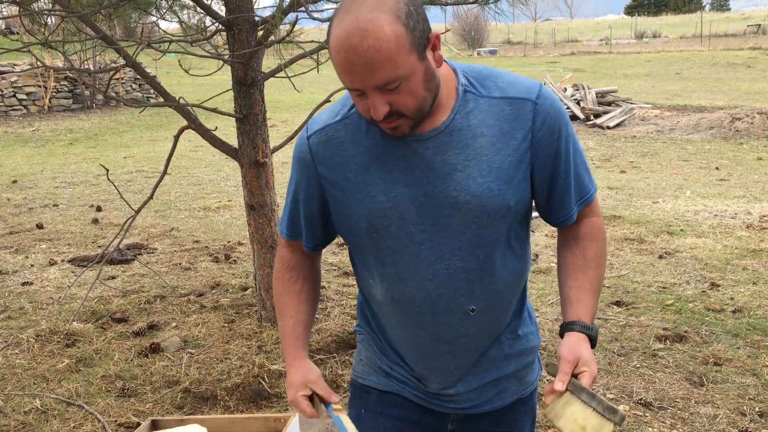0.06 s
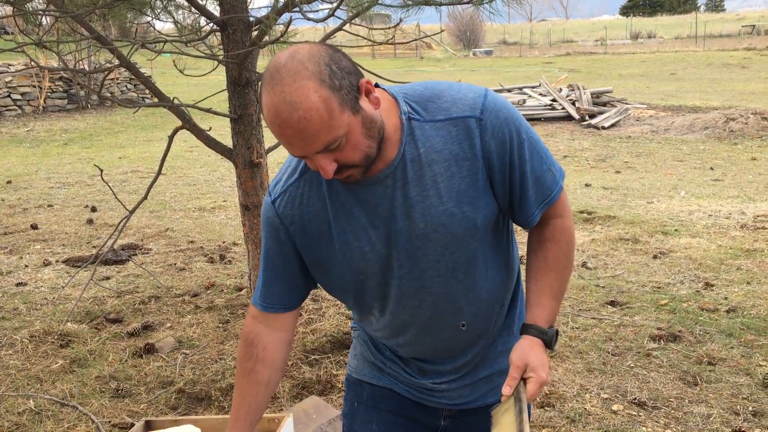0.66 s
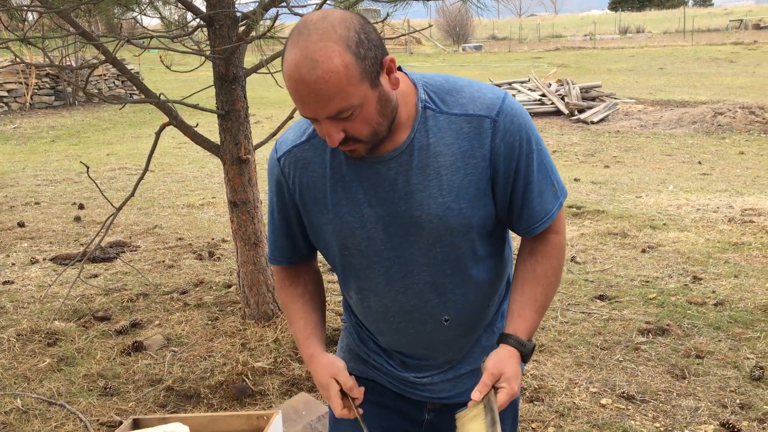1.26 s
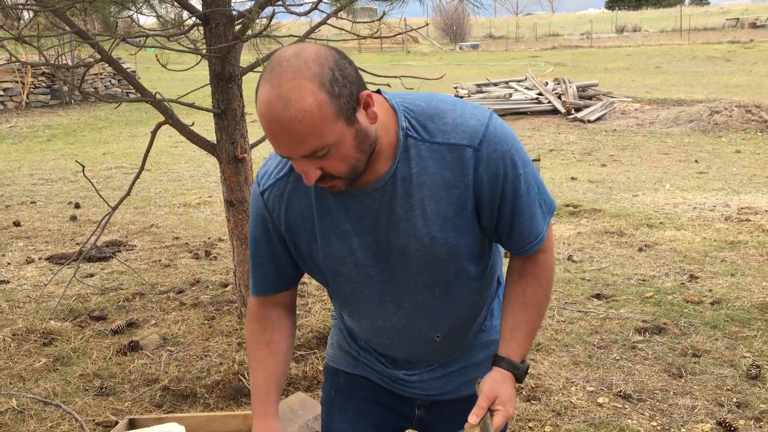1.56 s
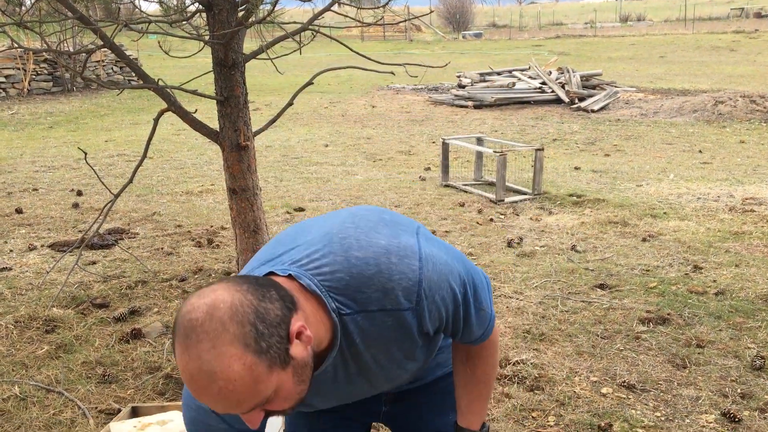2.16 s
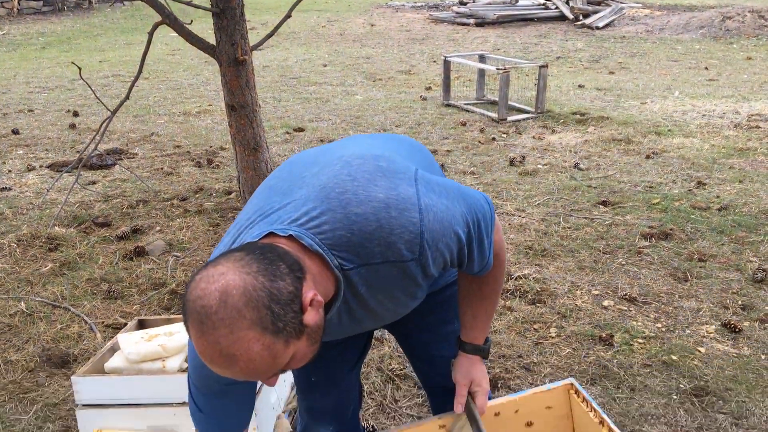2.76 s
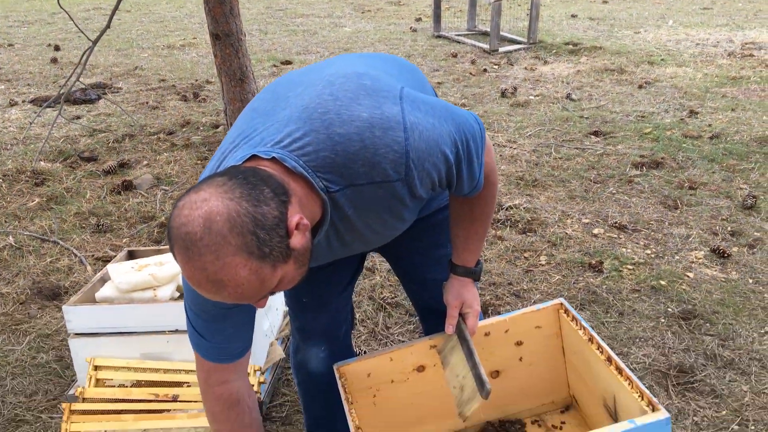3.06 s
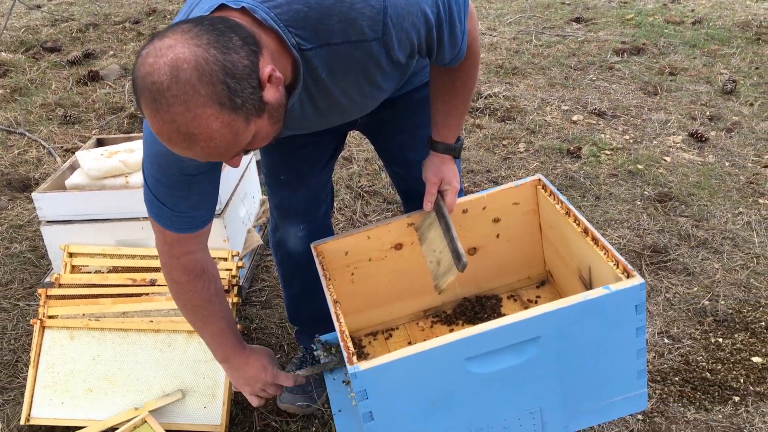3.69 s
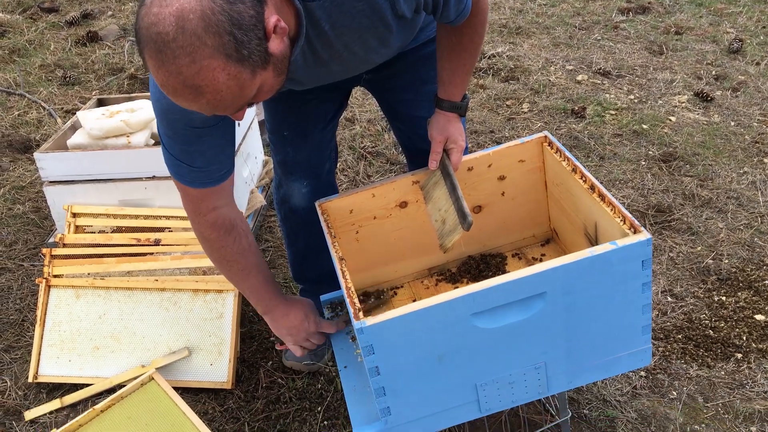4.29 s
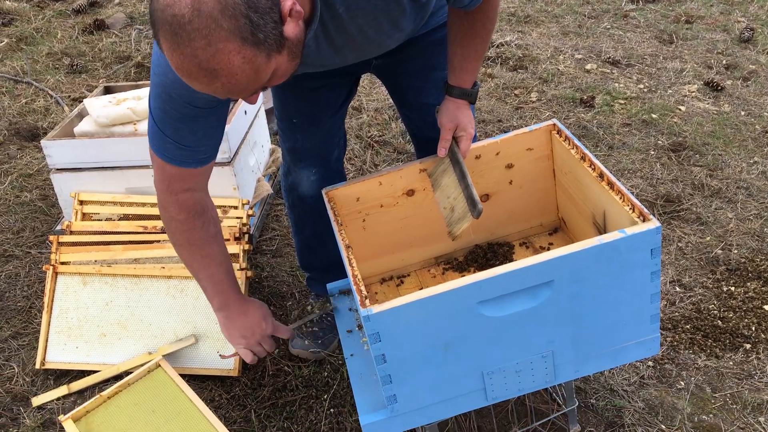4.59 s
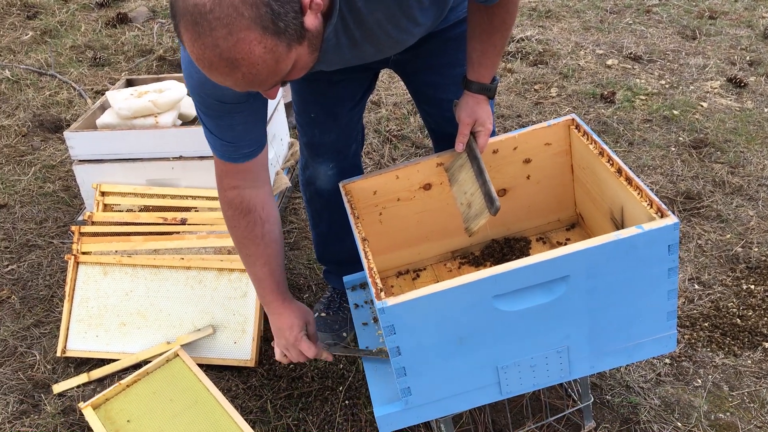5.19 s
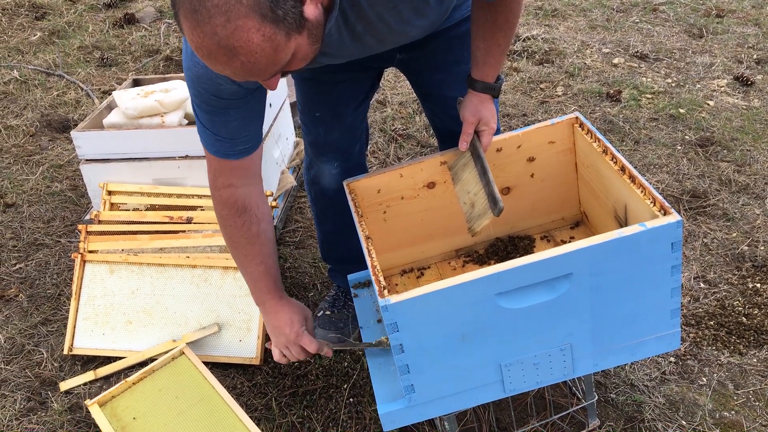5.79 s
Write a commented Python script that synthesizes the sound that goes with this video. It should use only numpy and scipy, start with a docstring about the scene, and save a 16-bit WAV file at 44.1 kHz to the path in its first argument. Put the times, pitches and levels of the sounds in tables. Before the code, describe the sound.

Short, gritty scrapes and knocks of a metal blade on a hollow wooden hive, outdoors over gusty low wind rumble.

```python
"""A steel hive tool scrapes wax and debris off a beehive in short strokes, after clacking on loose wood.
Each stroke is a run of tiny slips that rings the boards, the hollow box and the blade over a gritty hiss
of crumbs; now and then the edge catches, squawks or squeaks, and the open box echoes briefly.
Outdoors, wind buffets the microphone in gusts, a far bird chirps, and a limiter holds down the peaks."""
import sys
import numpy as np
from scipy import signal
from scipy.fft import rfft, irfft, next_fast_len
from scipy.io import wavfile
from scipy.ndimage import uniform_filter1d, minimum_filter1d, map_coordinates

SR = 44100
rng = np.random.default_rng(int(sys.argv[2]) if len(sys.argv) > 2 else 0)


def dump(signal):
    """Clip the signal to [-1, 1] and save it as 16-bit WAV at the path in sys.argv[1]."""
    limited = np.clip(np.atleast_2d(signal).T, -1, 1)
    pcm = np.round(limited * 32767).astype(np.int16)
    wavfile.write(sys.argv[1], SR, pcm)


N = 266364

# resonances of the hive's boards: f/Hz, width/Hz, level/dB
BOARD_MODES = [(640, 70, -14), (941, 22, -0.5), (1010, 40, -1), (1165, 34, 6.5), (1255, 45, -3),
               (1382, 38, 2.5), (1540, 110, -4), (1685, 45, -4), (2035, 90, -4), (2240, 55, -5),
               (2449, 60, -7), (2774, 60, -9), (3435, 200, -13), (3900, 260, -16)]
# low resonances of the hollow box: f/Hz, width/Hz, level/dB
HOLLOW_MODES = [(216.6, 24.4, -4), (246.5, 15.3, 2.5), (314.7, 26.4, 0.5), (418, 16, -12), (530, 45, -13)]
# broad rasp of the wood: f/Hz, relative level/dB
RASP_SPECTRUM = [(200, 6), (780, 9.5), (1150, 21.5), (2200, -34), (3600, -66), (5000, -20), (9000, -21)]


def amp(db):
    """Decibels to gain."""
    return 10 ** (np.asarray(db) / 20)


def unit(x):
    """x at rms 1."""
    return x / np.sqrt(np.mean(x ** 2) + 1e-20)


def unit_attack(x):
    """x with its first 8 ms at rms 1."""
    return x / np.sqrt(np.mean(x[:350] ** 2) + 1e-20)


def wobble(rate):
    """A smooth random curve, rate knots a second."""
    knots = rng.standard_normal(int(N * rate / SR) + 4)
    return map_coordinates(knots, [np.arange(N) * rate / SR])


def filtered(x, response):
    """x through a complex frequency response."""
    size = next_fast_len(len(x) + SR // 4)
    return irfft(rfft(x, size) * response(np.fft.rfftfreq(size, 1 / SR)), size)[:len(x)]


def coloured(x, spectrum):
    """x through an EQ curve with rows f/Hz, level/dB."""
    f, db = np.transpose(spectrum)
    return filtered(x, lambda hz: amp(np.interp(np.log(hz + 1), np.log(f), db)))


def resonate(x, modes):
    """x through resonances of alternating polarity, with rows f/Hz, width/Hz, level/dB."""
    return filtered(x, lambda f: sum(
        (-1) ** k * amp(db) * 1j * f * width / (hz * hz - f * f + 1j * f * width)
        for k, (hz, width, db) in enumerate(modes)))


def add(track, s, sound):
    """Mix a sound into the track at time s."""
    rest = track[round(s * SR):]
    rest[:len(sound)] += sound[:len(rest)]


def burst(t60):
    """A flurry of tiny impacts: noise that falls 60 dB in t60 seconds."""
    t = np.arange(SR // 5) / SR
    return rng.standard_normal(len(t)) * amp(-60 * t / t60)


def field():
    """A faint outdoor hiss that dips as the recorder turns down during strong gusts."""
    # the recorder's gain dips, drawn as a set curve on the hiss: t/s, level/dB
    ride = [(0, -39.5), (.7, -44), (1.2, -48.5), (1.8, -48), (2.6, -42.5), (4.6, -42), (4.9, -49),
            (5.3, -43.5), (6.04, -41.5)]
    # colour of the open air: f/Hz, relative level/dB
    air = [(500, 2), (1400, 0.5), (2100, -3.5), (3300, -9), (5000, -16.5), (9000, -18.5), (13000, -23.5),
           (15800, -25)]
    level_db = np.interp(np.arange(N) / SR, *np.transpose(ride))
    return amp(level_db) * unit(coloured(rng.standard_normal(N), air))


def bird():
    """A far bird: short, wavering whistles that fall slightly."""
    # chirps: t/s, length/s, f/Hz
    chirps = [(1.905, 0.076, 3780), (1.972, 0.05, 3500), (2.084, 0.064, 3850), (2.379, 0.058, 3950)]
    out = np.zeros(N)
    for s, length, hz in chirps:
        progress = np.linspace(0, 1, int(length * SR))
        pitch = hz * (1 - 0.056 * (progress - .5) + 0.042 * wobble(600)[:len(progress)])
        whistle = np.sin(2 * np.pi * np.cumsum(pitch) / SR)
        add(out, s, amp(-47.5) * np.sin(np.pi * progress) * whistle)
    return out


def wind_strength(breeze_db=-25.5, rise_s=0.038, fall_s=0.079):
    """Wind level in dB: each gust swells 10 dB per rise_s, holds, and sinks back into the breeze."""
    # gusts: start/s, end/s, level/dB
    gusts = [(0.0, 0.132, -15.5), (0.334, 0.53, -14), (0.565, 0.884, -18.5), (1.063, 1.33, -14),
             (1.354, 1.939, -13), (1.993, 2.132, -15), (2.23, 2.516, -17.5), (2.653, 2.834, -16.5),
             (3.147, 3.773, -15), (3.824, 4.386, -16), (4.375, 4.682, -12.5), (4.808, 5.051, -12),
             (5.262, 5.418, -13), (5.607, 6.04, -15)]
    t = np.arange(N) / SR
    level_db = np.full(N, breeze_db)
    for start, end, db in gusts:
        away = np.maximum((start - t) / rise_s, (t - end) / fall_s)
        level_db = np.maximum(level_db, db - 10 * np.maximum(0, away))
    return level_db


def rumble(lumps_db=4.0):
    """Pressure of big eddies: even in the long run, lumpy from moment to moment."""
    # colour of the rumble: f/Hz, relative level/dB
    spectrum = [(18, -46), (30, -23), (46, -6), (68, 0.5), (105, -2.5), (165, -6.5), (260, -15), (400, -28),
                (650, -64), (1200, -73.5)]
    pressure = unit(coloured(rng.standard_normal(N), spectrum)) * amp(lumps_db * wobble(55))
    return pressure / np.sqrt(np.abs(uniform_filter1d(pressure ** 2, 3000)) + 1e-6)


def eddies(rows):
    """Each eddy pushes and pulls once on the microphone; smaller ones pass faster and sound higher."""
    out = np.zeros(N)
    for s, db, hz in rows:
        phase = np.arange(-5, 5, 2 * np.pi * hz / SR)
        pulse = -phase * np.exp((1 - phase ** 2) / 2)
        add(out, max(0, s - len(pulse) / SR / 2), amp(db) * pulse)
    return out


def flutter(hz=175, pitch_spread=0.28, spread_db=2.5, count=700):
    """A ragged train of small eddies, at rms 1."""
    late, strength, pitch = np.clip(rng.standard_normal((count, 3)), -2, 2).T
    times = (np.arange(count) + 0.392 * late) * N / SR / count
    return unit(eddies(zip(times, spread_db * strength, hz * np.exp(pitch_spread * pitch))))


def wind():
    """Big eddies rumble on the microphone; small ones flutter above, growing faster than the wind."""
    # single hard buffets: t/s, peak level/dB, centre f/Hz
    buffets = [(1.232, -3, 190), (1.365, -7.5, 295), (1.546, -7.5, 343), (1.934, -6.5, 255),
               (2.753, -3, 164), (3.539, -7.5, 207), (4.484, 0, 185), (4.536, -4, 214), (4.971, -8, 300),
               (5.047, -9.5, 282), (5.817, -0.5, 147)]
    strength_db = wind_strength()
    flutter_db = -19 + 4.17 * (strength_db + 13)
    return amp(strength_db) * rumble() + amp(flutter_db) * flutter() + eddies(buffets)


def cavity(x, wet_db=-8.5):
    """The brief echo of sound bouncing between the walls of the open box."""
    tail = coloured(burst(t60=0.079), [(200, -8.5), (1500, -0.5), (9000, -12.5)])
    return amp(wet_db) * np.std(x) * unit(signal.fftconvolve(x, tail)[:N])


def clacks():
    """Steel strikes loose wood and bounces: a crack, a hollow knock and a short ring at every contact."""
    # contacts: t/s, relative level of crack and ring/dB, knock level/dB, part struck
    contacts = [(.8988, -3, -39, "frame"), (0.9062, -7, -19, "frame"), (.9126, -12.5, -18, "frame"),
                (.9305, -17.5, -18.5, "frame"), (.9975, -27, -25, "board"), (1.0012, -17.5, -24, "board"),
                (1.0268, -15.5, -32, "board"), (1.0308, -10.5, -8.5, "board"), (1.039, -11, -14, "board"),
                (1.056, -18.5, -24, "board"), (1.0625, -21.5, -24, "board")]
    # modes of each loose part, the hollow knock first: f/Hz, level/dB, t60/s
    parts = {"frame": [(620, -2, .14), (1230, 0, .045), (1750, 6, .025), (2190, 3, .09), (2510, -3, .05),
             (3450, 9, .022)], "board": [(678, -2, .05), (1060, -1, .035), (1440, 2, .03), (2110, 0, .03),
             (3710, -1, .012)]}
    # colour of steel cracking on wood: f/Hz, relative level/dB
    crack_spectrum = [(300, 2), (620, -2.5), (900, 0.5), (1800, -2), (2900, -5.5), (3600, -7.5),
                      (4800, -19), (15800, -30.5)]
    out, t = np.zeros(N), np.arange(SR // 5) / SR
    knock_envelope = (1 - np.exp(-t / 0.00067)) * amp(-60 * t / 0.036)
    for s, db, knock_db, part in contacts:
        ring = np.zeros(len(t))
        for hz, mode_db, t60 in parts[part]:
            decay = amp(mode_db + 2 * rng.standard_normal() - 60 * t / t60)
            ring += decay * np.sin(2 * np.pi * (hz * t + rng.random()))
        crack = coloured(burst(t60=0.05), crack_spectrum)
        clack = amp(-13) * unit_attack(ring) + amp(-9) * unit_attack(crack)
        knock_hz = parts[part][0][0]
        knock = unit_attack(knock_envelope * np.sin(2 * np.pi * knock_hz * t))
        add(out, s, amp(db) * clack + amp(knock_db) * knock)
    return out


def squeaks(hz=12200, width_hz=900, half_length_s=0.048):
    """Bare steel gliding on wood sings in one narrow, high band."""
    # glides of the bare edge: peak t/s, level/dB
    glides = [(5.39, -52), (6.02, -43)]
    t = np.arange(N) / SR
    swell = sum(amp(db - 10 * ((t - s) / half_length_s) ** 2) for s, db in glides)
    flicker = amp(3.4 * wobble(100))
    band = [(hz, width_hz, 0)]
    return swell * flicker * unit(resonate(resonate(rng.standard_normal(N), band), band))


def grabs(sag_per_s=1.67, pitch_jitter=.04, rough_db=2):
    """Stick and slip lock into a short rough squawk that sinks as the blade slows."""
    # squawks: peak t/s, half length/s, f/Hz, level/dB
    squawks = [(2.624, .01, 1206, -13), (2.646, 0.018, 938, -22.5), (2.677, .016, 1139, -10.5)]
    # harmonics of the judder: multiple of the pitch, level/dB
    harmonics = [(1, 0), (3, -11)]
    out, t = np.zeros(N), np.arange(N) / SR
    for s, half, hz, db in squawks:
        from_peak = t[np.abs(t - s) < 2 * half] - s
        timing = wobble(hz)[:len(from_peak)]
        strength = wobble(hz / 2)[:len(from_peak)]
        pitch = hz * (1 - sag_per_s * from_peak + pitch_jitter * timing)
        phase = 2 * np.pi * np.cumsum(pitch) / SR
        tone = sum(amp(level) * np.sin(k * phase) for k, level in harmonics)
        swell = amp(db - 10 * (from_peak / half) ** 2 + rough_db * strength)
        add(out, s + from_peak[0], swell * tone)
    return out


def catches(snap_db_per_octave=-12.5):
    """The edge snags or bumps: a sharp snap, the boards answer and the box thuds."""
    # snags and bumps: t/s, relative level of wood and thud/dB, snap level/dB, snap centre f/Hz
    snags = [(1.962, -35, -46.5, 6000), (2.334, -16, -57, 1990), (2.546, -19.5, -47, 2000),
             (2.587, -17, -39, 3000), (2.8, -12, -26, 6150), (2.882, -22.5, -33.5, 2870),
             (2.931, -40, -30.5, 7760), (2.959, -16, -30.5, 3900), (2.983, -15.5, -29.5, 2560),
             (2.993, -15, -34, 2500), (3.044, -32, -38, 5000), (3.259, -21.5, -22, 3550),
             (3.478, -29, -33, 3180), (3.648, -18.5, -37.5, 8000), (3.954, -25, -36.5, 2460),
             (3.995, -23.5, -40, 8100), (4.394, -27, -33.5, 6100), (4.617, -13.5, -39, 4000),
             (4.726, -26, -41.5, 4000), (4.818, -7.5, -38.5, 2060), (5.517, -34, -34, 5000),
             (5.552, -25, -37.5, 4000), (5.606, -19, -32.5, 3000), (5.874, -7.5, -26.5, 3280)]
    out, t = np.zeros(N), np.arange(SR // 5) / SR
    shove = t * np.exp(-t / 0.0006)  # the heavy box feels only a rounded push
    for s, db, snap_db, snap_hz in snags:
        blow = burst(t60=0.017)
        boards = amp(-15) * unit_attack(resonate(blow, BOARD_MODES))
        rasp = amp(-10.5) * unit_attack(coloured(blow, RASP_SPECTRUM))
        bluntness_db = 0.48 * min(db - snap_db, 28)  # a blunt bump shakes the box more than a sharp snag
        thud = amp(bluntness_db - 14.5) * unit_attack(resonate(shove, HOLLOW_MODES))
        snap = filtered(burst(t60=.03),
                        lambda hz: amp(snap_db_per_octave * np.abs(np.log2((hz + 1) / snap_hz))))
        add(out, s, amp(db) * (boards + rasp + thud) + amp(snap_db) * unit_attack(snap))
    return out


def crumbs(count=30000, decay_cycles=3):
    """Bits of dry wax snapping off: tiny pings, each with its own pitch and size, at rms 1."""
    when, pitch, strength = rng.random((count, 3)).T[:, :, None]
    samples = np.arange(128)
    hz = 2000 * 7 ** pitch  # 2 to 14 kHz
    cycles = hz * samples / SR
    gain = amp(20 * strength ** 2) * np.sqrt(hz)
    pings = gain * np.sin(2 * np.pi * cycles) * np.exp(-cycles / decay_cycles)
    positions = (when * N).astype(int) + samples
    return unit(np.bincount(positions.ravel(), pings.ravel())[:N])


def slips(per_s, spread_db, judder_db, rub):
    """Friction force: random slips of uneven size over a smooth rub, bunched as the blade judders."""
    slipping = rng.random(N) < per_s / SR
    grains = slipping * rng.standard_normal(N) * amp(spread_db * rng.standard_normal(N))
    force = unit(grains) + rub * rng.standard_normal(N)
    return unit(force * amp(judder_db * wobble(170)))


def driven(swell, force, modes, spread_db=2.5):
    """Modes rung by a swelling force, near rms 1 at its peak; each contact point favours other modes."""
    modes = [(hz, width, db + spread_db * rng.standard_normal()) for hz, width, db in modes]
    return resonate(swell * force, modes) / np.std(resonate(force, modes))


def scraping(swell_shape=1.39, chatter_width_hz=150, buried_from_s=2.72, buried_to_s=5.0):
    """Each stroke swells and lets go, driving boards and box; crumbling debris hisses and rings steel."""
    # strokes: peak t/s, rise/s, fall/s, wood level/dB, grit level/dB, chatter f/Hz, chatter over wood/dB
    strokes = [(2.451, 0.16, 0.075, -44, -50, 1210, -9), (2.606, 0.041, 0.0062, -27, -36.5, 1420, -1),
               (2.621, 0.016, 0.0054, -22.5, -27, 3250, -1), (2.649, 0.015, 0.017, -33, -28, 1340, 7),
               (2.671, 0.018, 0.016, -15, -23.5, 1630, -1), (2.764, 0.033, 0.075, -37, -29, 1320, 7.5),
               (2.97, 0.018, 0.046, -28.5, -40.5, 1070, -19), (3.164, 0.063, 0.074, -25, -32, 1380, -8),
               (3.418, 0.077, 0.03, -36.5, -40, 1460, 0), (3.487, 0.024, 0.013, -33.5, -50, 1270, 4.5),
               (3.56, 0.067, .1, -42.5, -53, 1320, -3), (3.699, 0.029, 0.038, -31.5, -38, 1520, -1),
               (3.839, 0.11, 0.11, -41, -45, 1700, 0), (4.062, 0.063, 0.033, -17, -30.5, 590, -3.5),
               (4.225, 0.11, 0.043, -43, -44, 2370, -11), (4.39, 0.048, 0.0091, -30, -38.5, 1300, -11),
               (4.466, 0.044, 0.19, -37, -40, 1190, -18), (4.628, 0.077, 0.043, -30, -42, 1230, 0.5),
               (4.789, 0.058, 0.037, -53, -48.5, 1300, -9), (5.396, 0.068, 0.041, -33.5, -44, 1990, -3.5),
               (5.504, 0.047, 0.024, -33.5, -38, 1390, 6), (5.556, 0.015, 0.087, -38, -45.5, 1400, 6.5),
               (5.631, 0.019, 0.011, -21.5, -30.5, 2020, -1), (5.72, 0.024, 0.029, -43.5, -41.5, 1370, 13),
               (5.962, 0.051, 0.068, -30, -44, 1950, -18), (6.034, 0.031, 0.066, -28, -30, 1600, -1)]
    # resonances of the steel blade: f/Hz, width/Hz, level/dB
    blade_modes = [(6627, 55, 0), (7612, 60, 0), (8400, 130, 0), (11400, 400, -8), (12450, 450, -6)]
    # colour of the gritty hiss: f/Hz, relative level/dB
    grit_spectrum = [(1500, 6), (3500, 6), (5000, 1), (9500, 1.5), (10400, -5), (11400, 4.5), (13000, -4),
                     (15800, -2)]
    grip = wobble(60)  # wax lets the edge stick and skip
    friction = amp(2.2 * grip) * slips(per_s=1000, spread_db=6, judder_db=1, rub=0.49)
    crumbling = amp(grip) * slips(per_s=1900, spread_db=3, judder_db=2, rub=1)
    drag = coloured(friction, [(330, -6.5), (800, -8), (2000, -29)])  # the heavy box follows slow pulls
    bite = coloured(crumbling, [(300, 4), (600, 2), (2400, 7.5), (5000, -34)])
    rasp = unit(coloured(friction, RASP_SPECTRUM))
    hiss = unit(coloured(crumbling + crumbs(), grit_spectrum))
    out, t = np.zeros(N), np.arange(N) / SR
    for s, rise, fall, wood_db, grit_db, chatter_hz, chatter_db in strokes:
        near = (t > s - 3 * rise) & (t < s + 3 * fall + .04)
        away = np.maximum((s - t[near]) / rise, (t[near] - s) / fall)
        swell = amp(-15 * away ** swell_shape)
        # debris damps the buried blade; when it is free, its ring grows faster than the hiss
        ring_db = -15 if buried_from_s < s < buried_to_s else 1.3 * (grit_db + 25)
        hollow_db = 10 - 0.16 * (wood_db + 35)  # the box grows less than the boards on hard strokes
        boards = driven(swell, friction[near], BOARD_MODES)
        hollow = amp(hollow_db) * driven(swell, drag[near], HOLLOW_MODES)
        chatter = amp(chatter_db) * driven(swell, bite[near], [(chatter_hz, chatter_width_hz, 0)])
        blade = amp(ring_db) * driven(swell, crumbling[near], blade_modes)
        out[near] += amp(wood_db) * (boards + hollow + chatter + amp(-3) * swell * rasp[near])
        out[near] += amp(grit_db) * (blade + amp(3.5) * swell * hiss[near])
    return out


def scene():
    """The tool's work, its echo in the box and the outdoor bed, mixed at one microphone."""
    work = scraping() + grabs() + squeaks() + catches()
    return (work + cavity(work) + clacks() + wind() + field() + bird())[None]


def record(dry):
    """A limiter ducks fast on a peak and recovers gradually; the deepest bass and top treble are cut."""
    ceiling, release_db_per_s, attack_samples = .69, 40, 100
    low_cut_hz, top_hz = 20, 15800
    excess_db = 20 * np.log10(np.maximum(1, np.abs(dry[0]) / ceiling))
    recovery_db = release_db_per_s * np.arange(N) / SR
    gain = amp(recovery_db - np.maximum.accumulate(excess_db + recovery_db))
    gain = uniform_filter1d(minimum_filter1d(gain, attack_samples), attack_samples)
    limited = dry[0] * gain
    return filtered(limited, lambda hz: (hz < top_hz) * hz ** 4 / (hz ** 4 + low_cut_hz ** 4))[None]


dry = scene()
out = record(dry)
dump(out)
```